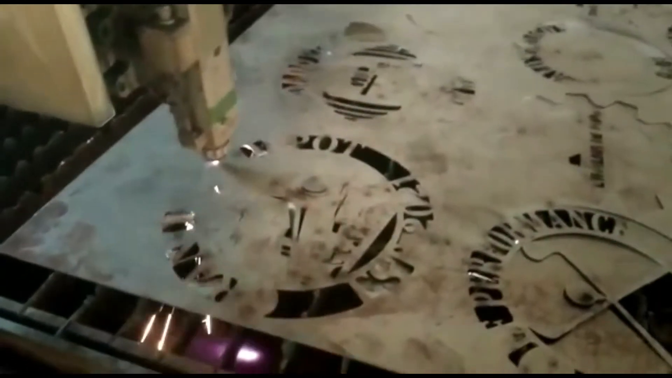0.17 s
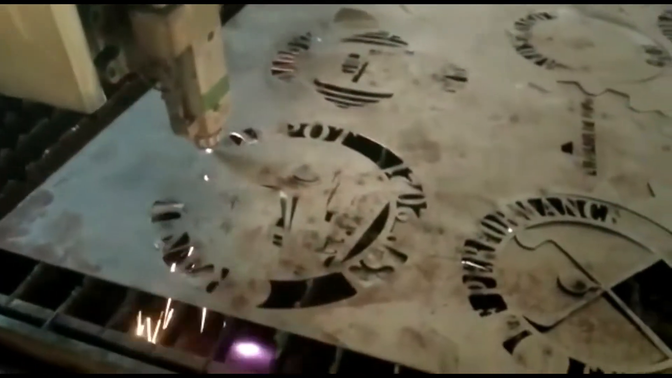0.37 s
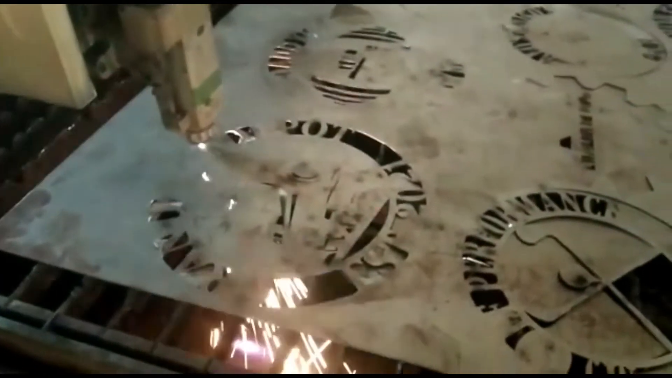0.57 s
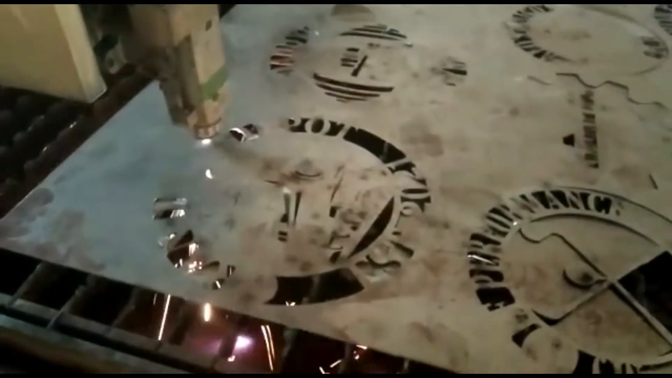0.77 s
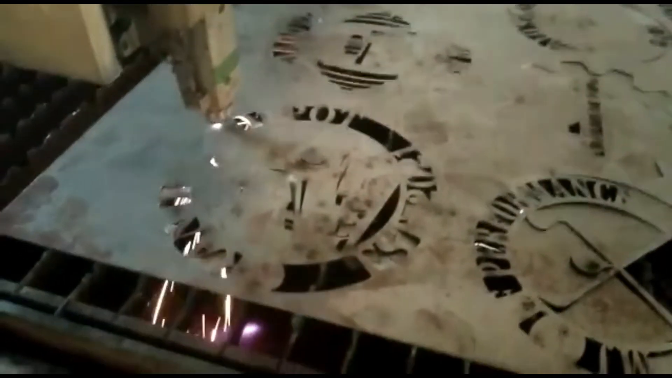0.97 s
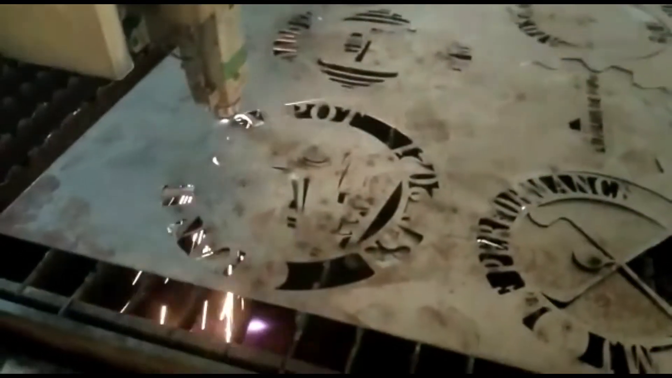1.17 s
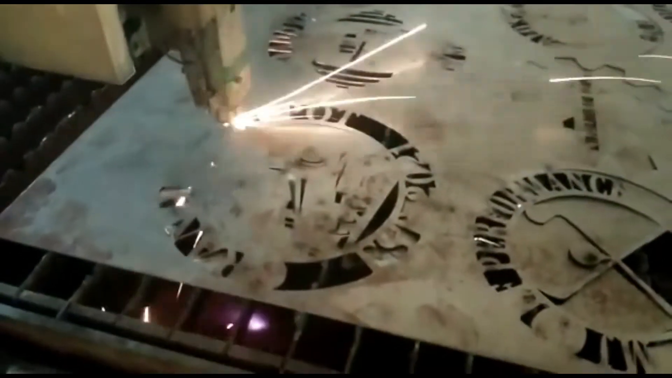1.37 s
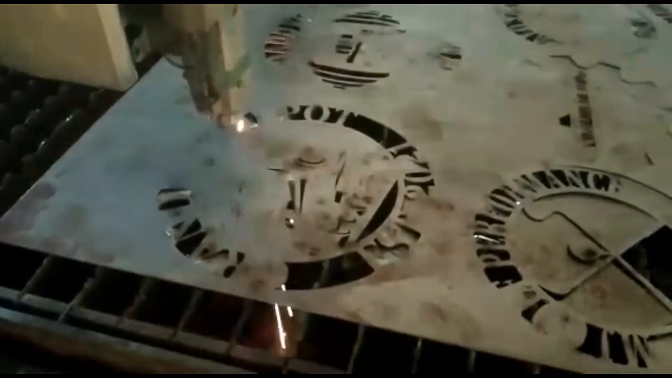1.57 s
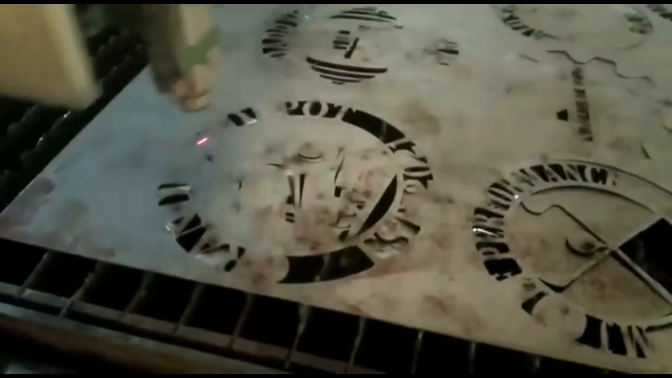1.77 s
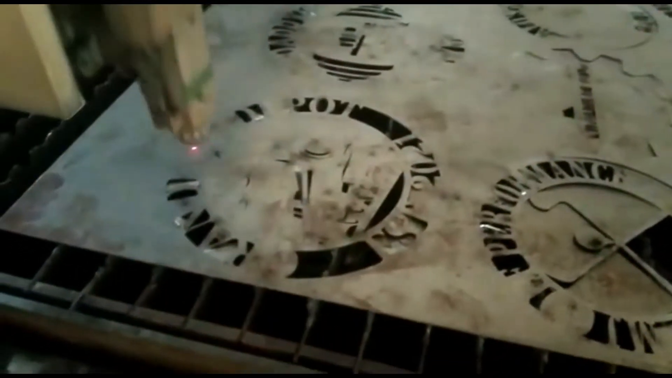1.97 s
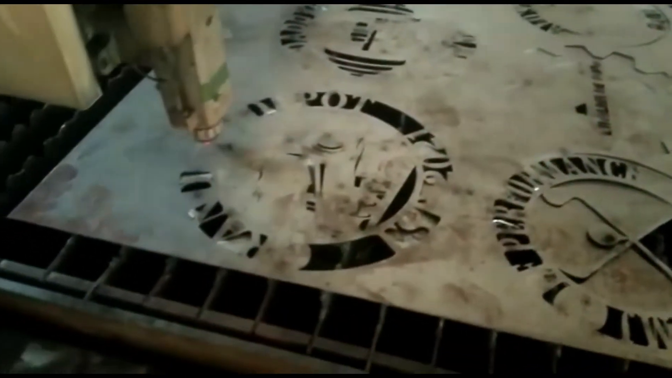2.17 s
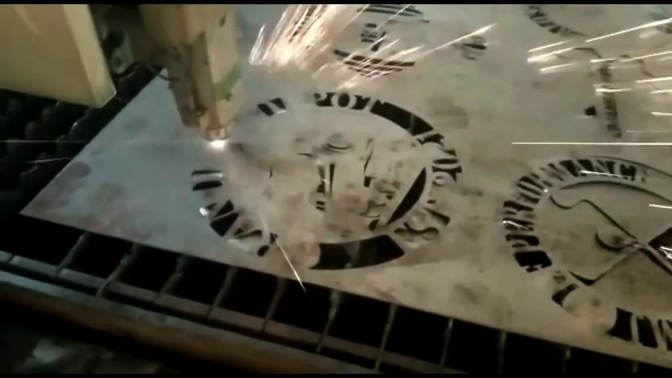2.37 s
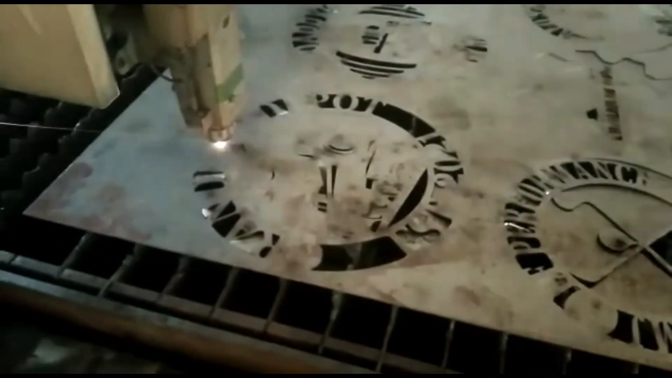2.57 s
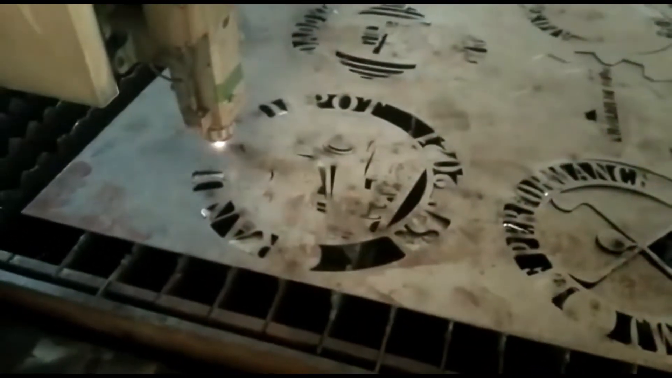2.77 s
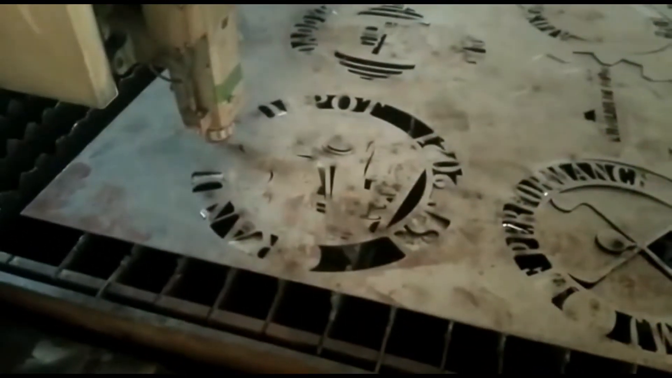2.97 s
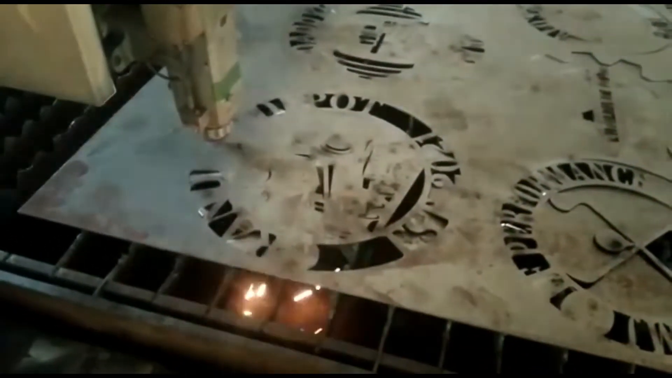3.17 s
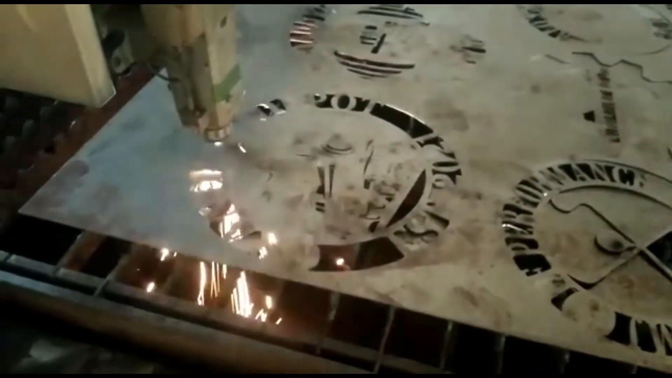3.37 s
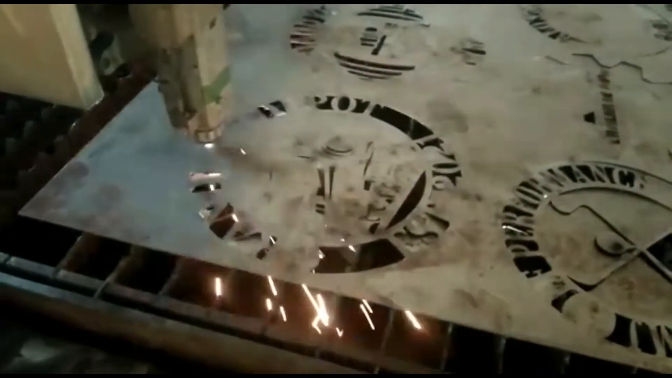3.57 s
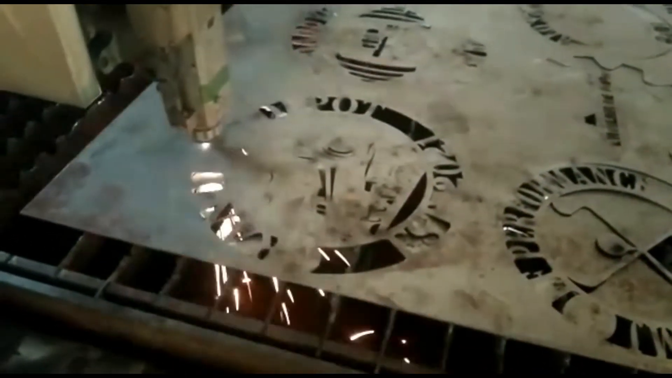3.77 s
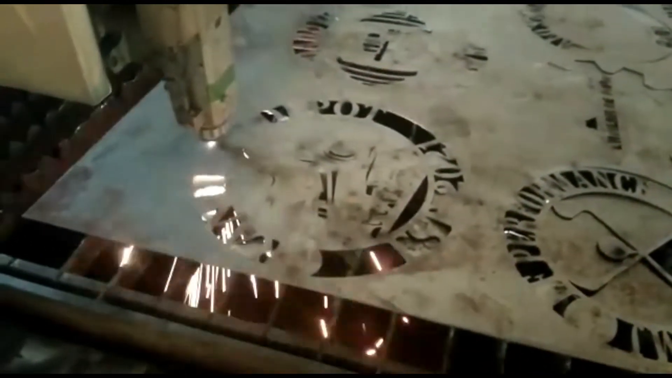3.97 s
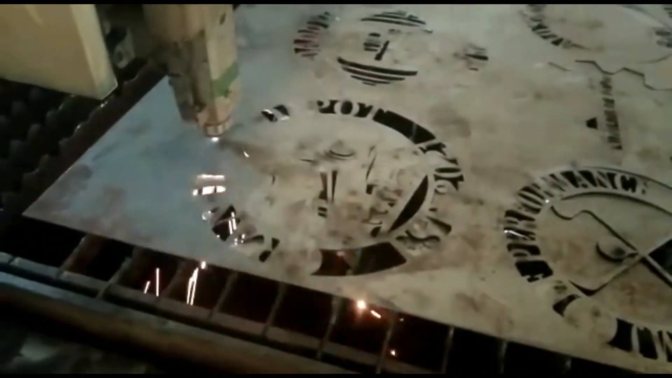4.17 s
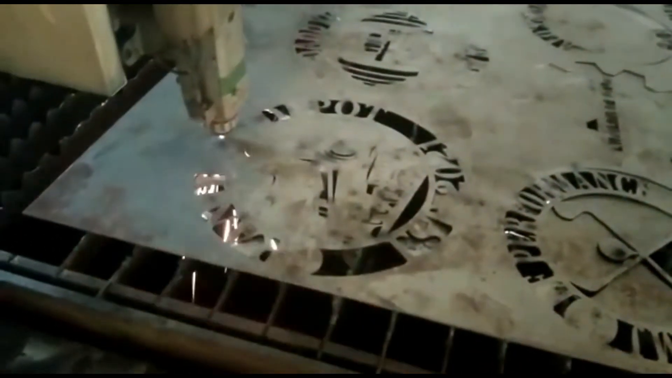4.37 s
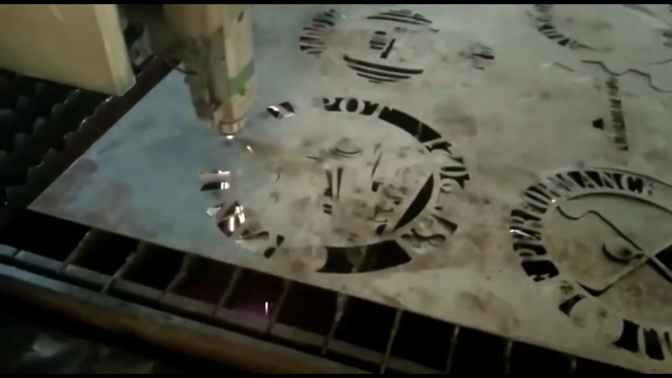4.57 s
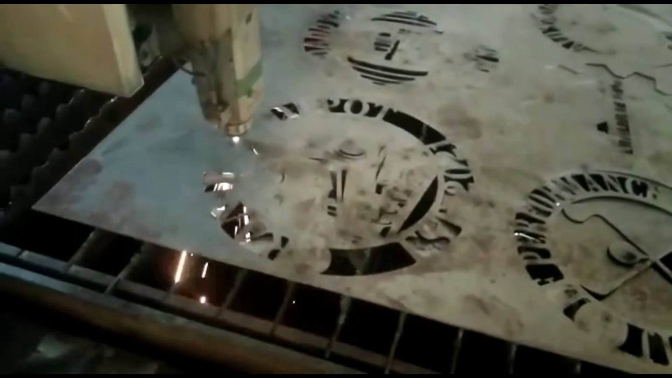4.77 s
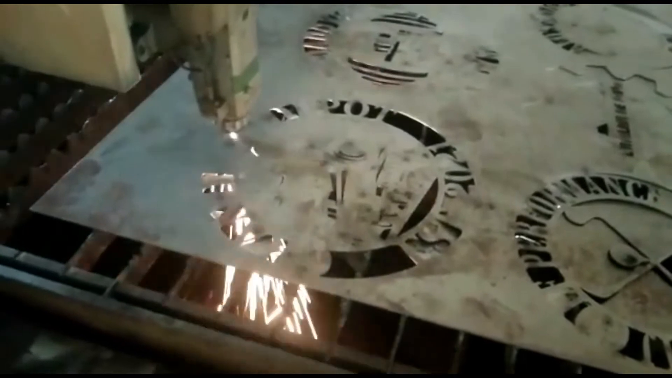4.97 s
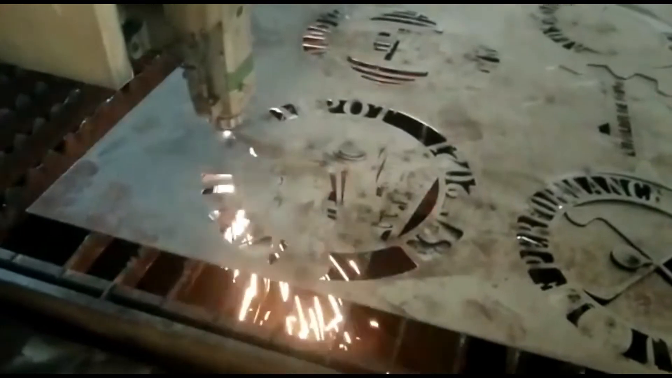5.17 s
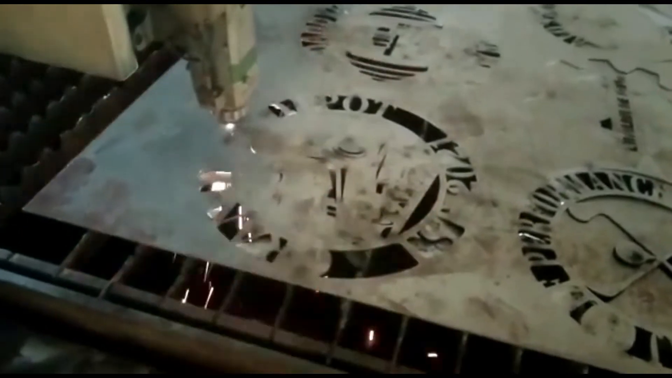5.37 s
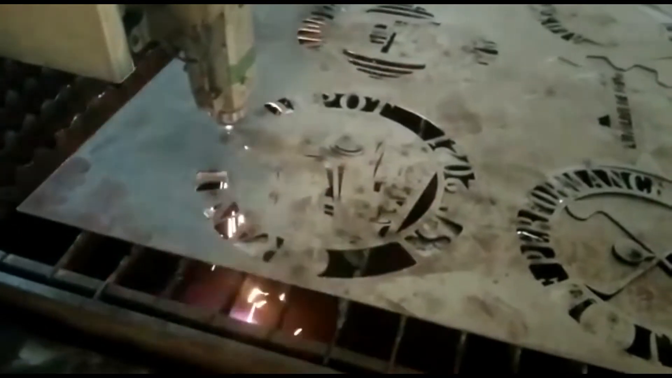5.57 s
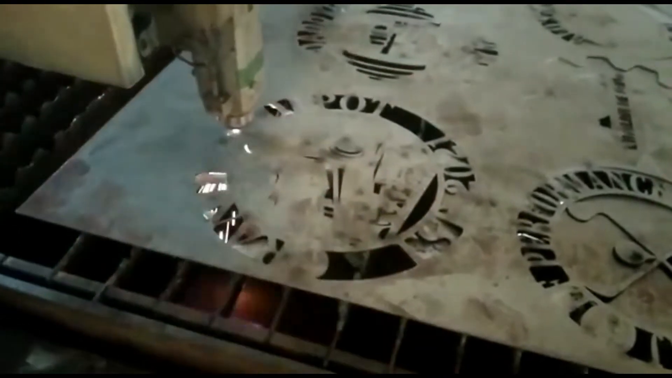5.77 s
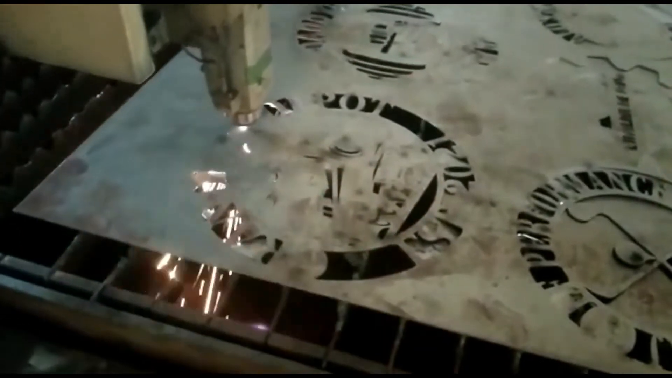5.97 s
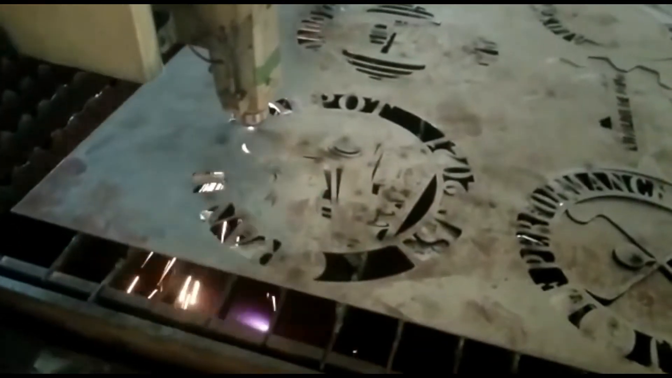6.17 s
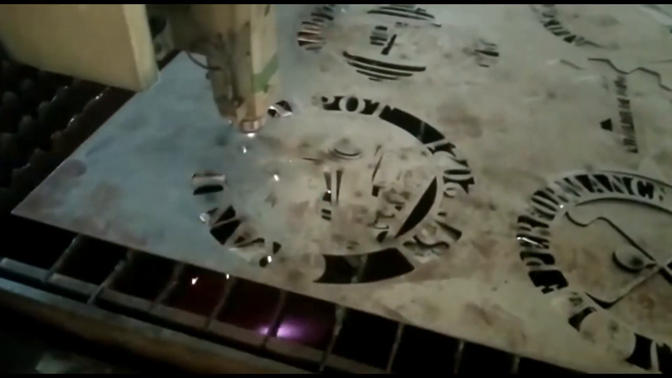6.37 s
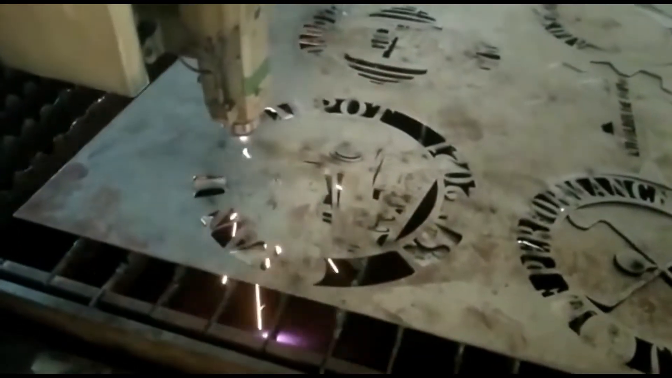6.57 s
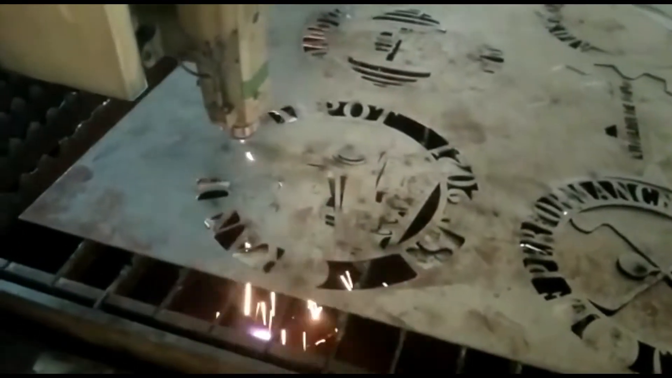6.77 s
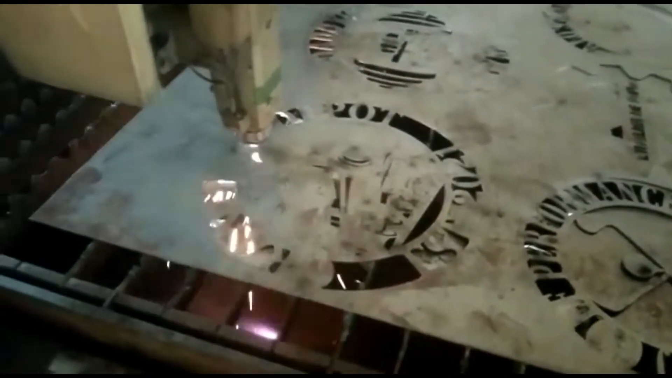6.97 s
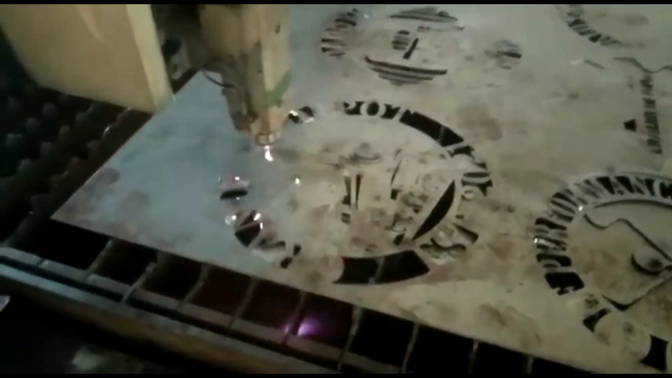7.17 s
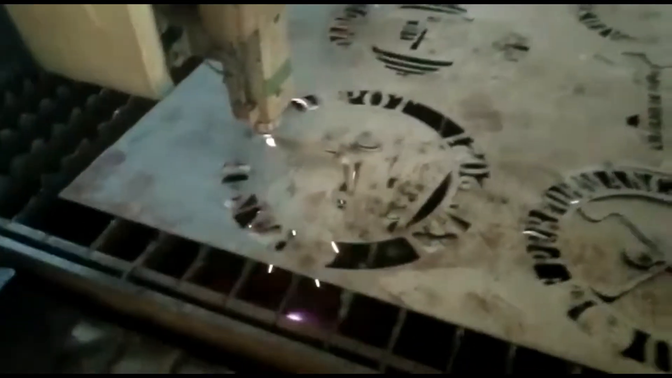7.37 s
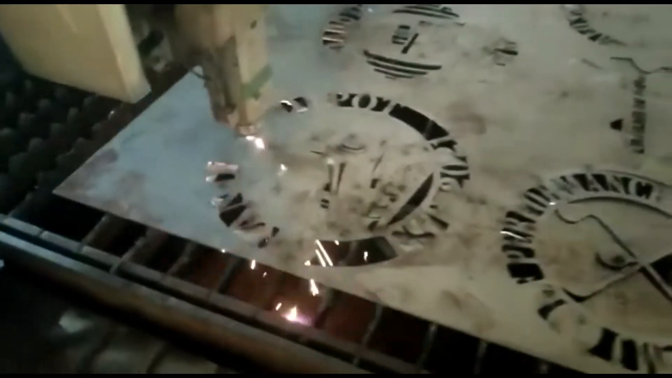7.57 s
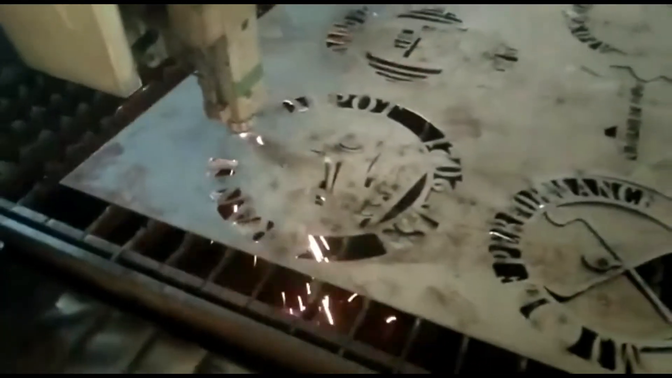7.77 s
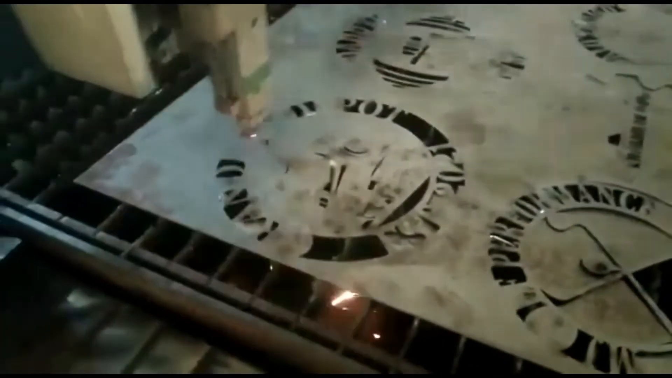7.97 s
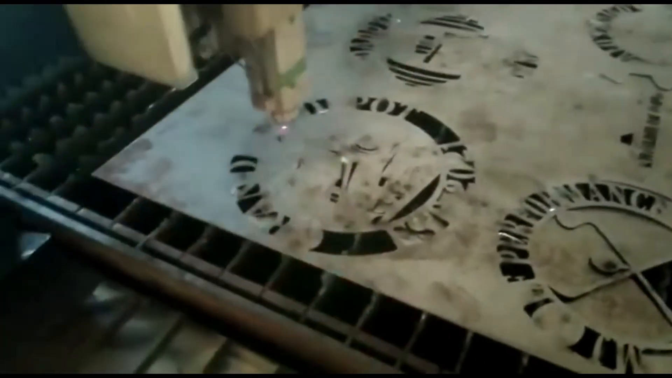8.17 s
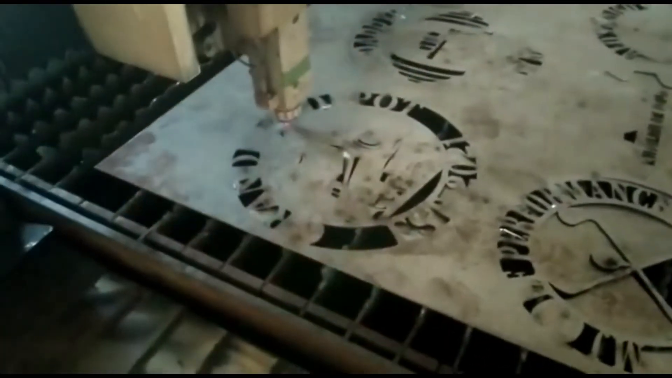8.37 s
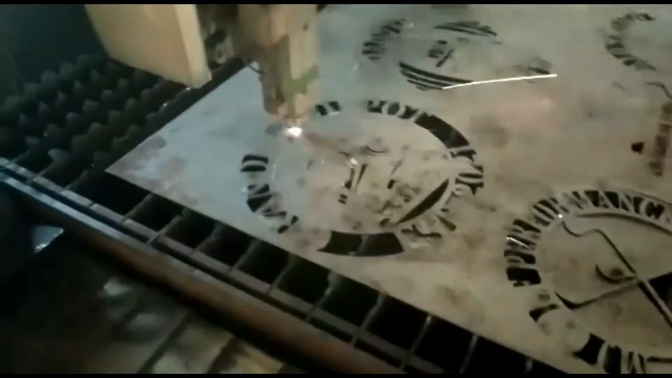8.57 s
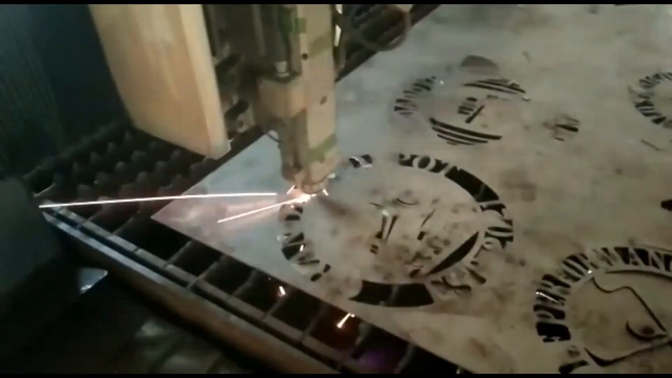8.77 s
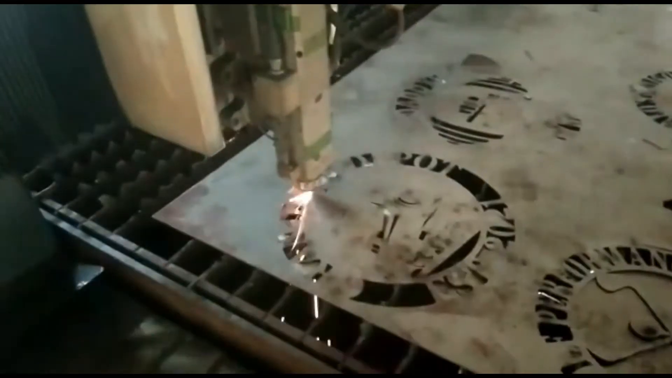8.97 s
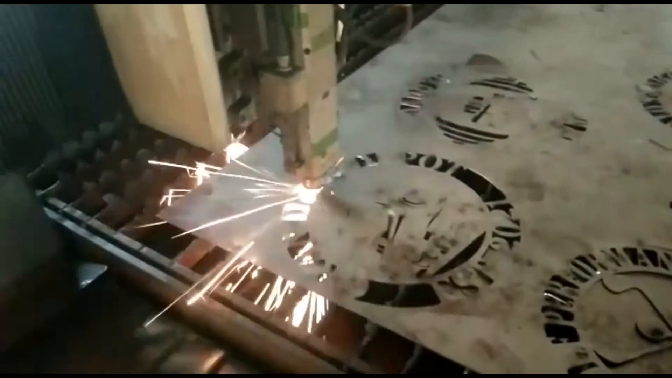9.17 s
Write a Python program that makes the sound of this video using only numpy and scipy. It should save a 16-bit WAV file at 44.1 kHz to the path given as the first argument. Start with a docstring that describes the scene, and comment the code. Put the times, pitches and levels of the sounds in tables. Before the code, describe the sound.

Steady high gas hiss from a laser head cutting steel, broken by two bouts of crackling pops and ending in a spray of spatter.

```python
"""A steady hiss of gas comes first: a laser head is cutting a steel sheet, close to one small microphone.
The gas hisses at the nozzle, rushes through the cut, roars under the table and whistles across slots.
When the head lifts and moves on, the jet sweeps over the microphone and buffets it with sharp pops.
Near the end the beam pierces the sheet: the gas surges and molten drops spray out.
Behind it all are a faint machine hum and, early on, one dull knock."""
import sys
import numpy as np
from scipy import signal
from scipy.fft import rfft, irfft, next_fast_len
from scipy.io import wavfile
from scipy.ndimage import uniform_filter1d, map_coordinates

SR = 44100
rng = np.random.default_rng(int(sys.argv[2]) if len(sys.argv) > 2 else 0)


def to_wav(sig):
    """Store sig (one row per channel, or 1-D mono) as 16-bit WAV at the path in sys.argv[1].

    Samples outside -1..1 are clipped; the rate is SR.
    """
    pcm = np.clip(np.atleast_2d(sig), -1, 1) * 32767
    pcm = np.round(pcm).astype(np.int16)
    wavfile.write(sys.argv[1], SR, pcm.T)  # frames by channels


N = 406161
T = np.arange(N) / SR
FFT_SIZE = next_fast_len(N)
FFT_HZ = np.fft.rfftfreq(FFT_SIZE, 1 / SR)

# tone colours of the nozzle hiss, the fine fizz above it, the rush and the roar: f/Hz, relative level/dB
HISS_COLOUR = [(2000, -66), (3000, -20), (4750, -11.5), (5300, -7.5), (6200, -2.5), (6780, 4), (7200, -5),
               (7750, -9), (8200, -16.5), (8900, -23.5), (10000, -26.5), (12000, -65)]
FIZZ_COLOUR = [(2000, -30), (6000, -12), (8000, -2), (9150, 1.5), (9650, -7), (10350, 2.5), (11300, -1),
               (11950, -4), (12400, -15), (12950, -8), (13500, -2), (14300, -.5), (15300, 1), (16400, 4)]
RUSH_COLOUR = [(800, -55), (1500, -29), (2250, -12), (2550, -5.5), (3250, -6.5), (3600, -0.5), (4150, 1),
               (4650, -1), (5350, 7.5), (6000, 5), (7000, 5), (9000, -25.5), (12000, -27)]
ROAR_COLOUR = [(50, -29), (200, -9.5), (600, -3.5), (900, -1.5), (1300, 0), (1750, 0), (2200, -3),
               (3200, -3), (6000, -31), (12000, -50)]
# slow drift of the hiss and of the fizz: t/s, relative level/dB
HISS_DRIFT = [(0, -26), (1.4, -26), (1.9, -20.5), (2.06, -28.5), (3.6, -28), (4.6, -25.5), (6.8, -25),
              (7.5, -25.5), (8.3, -27), (9.2, -36.5)]
FIZZ_DRIFT = [(0, -42.5), (1.7, -44.5), (2.3, -45.5), (3.2, -45), (4.2, -42), (5.2, -42), (8.5, -46)]
# gas forced through the cut as the head follows its path: t/s, relative rush/dB, relative roar/dB
CUT_DRIFT = [(0, -33, -41.5), (.9, -30, -42), (1.7, -25, -42), (2.2, -30.5, -47), (3.1, -30, -48),
             (3.7, -33, -45.5), (5.6, -33.5, -43.5), (6.3, -33.5, -45.5), (6.97, -30.5, -44.5),
             (7.13, -30.5, -42.5), (7.7, -30, -47), (8.72, -34, -49.5), (9, -25, -43)]
# the hiss and fizz slide down as head and microphone move: t/s, factor on frequency
COLOUR_SLIDE = [(0, 1), (2.2, .992), (3.5, .978), (5, .962), (6.5, .948), (8, .938), (9.2, .935)]
# swells of gas along the cut: peak t/s, build-up/s, hiss boost/dB, rush boost/dB
GAS_SWELLS = [(1.2, .3, 2.5, 1.5), (1.55, 0.13, 1.5, 3), (3.43, 0.39, 1, 3.5), (5.75, 0.22, -1, 5),
              (7.55, .25, -2.5, 6.5), (7.84, 0.22, 4, 1)]
# spurts as a new cut begins: t/s, settling time/s, hiss boost/dB, rush boost/dB, roar boost/dB
GAS_SPURTS = [(2.44, 0.27, 2, 1, 2), (8.58, 0.098, 0, 4.5, 6), (8.734, 0.17, 12, 5.5, 1.5)]
# whistles at slots and edges in the sheet: start t/s, end t/s, f/Hz, width/Hz, level at the middle/dB
SLOT_WHISTLES = [(0.601, 1.8, 1330, 110, -49.5), (0.699, 1.895, 2560, 260, -41.5),
                 (1.646, 2.125, 6650, 450, -23), (3.451, 4.15, 1770, 150, -51),
                 (3.76, 4.06, 3460, 60, -42.5), (4.35, 5.35, 2550, 160, -47), (5, 5.246, 1870, 70, -48),
                 (5.08, 5.38, 3520, 50, -41.5), (4.502, 7, 7330, 380, -32.5), (6.899, 7.65, 2550, 745, -41),
                 (8.198, 8.8, 3660, 380, -41.5)]
# jet on the microphone, fast cores in slower fringes, and stray puffs: t/s, length/s, wind speed (0-1)
JET_GUSTS = [(1.729, .147, .35), (1.746, .096, .9), (1.947, .13, .33), (1.968, .098, .94),
             (2.438, 0.044, 0.01), (2.722, 0.039, 0.01), (3.32, .03, .002), (8.06, .187, 0.32),
             (8.104, .045, 1), (8.209, .037, 0.51)]
# the biggest single eddies (swirls of air) that hit the microphone: t/s, relative level/dB
EDDY_POPS = [(1.7307, -17.5), (1.869, -21), (1.978, 4), (2.445, -27.5), (2.466, -30), (8.0643, -10.5),
             (8.0665, -12), (8.1055, -7.5), (8.1672, -14), (8.2032, -24), (8.2381, -7)]
# ring of the microphone's opening in wind: f/Hz, gain/dB
MIC_RING = [(100, 6), (2500, 3), (4500, 4), (6300, 11.5), (8000, -1), (10000, -9.5), (12200, -15),
            (15000, -6)]
# tone colour of molten drops thrown from the pierced hole: f/Hz, relative level/dB
SPATTER_COLOUR = [(500, -27), (720, -8), (880, 2.5), (1350, 3), (1700, -8), (3200, -7), (4900, 15),
                  (5700, 22), (6400, -5), (6900, 14), (7500, -1), (9100, 0.5), (10500, -25), (15000, -23)]
# knock from the gantry, the frame that carries the head: t/s, level/dB, f/Hz, time to fade by 60 dB/s
GANTRY_KNOCK = (.903, -26, 165, .05)
# hum of fans and pumps: f/Hz, level/dB
HUM_TONES = [(100, -62.5), (111, -68), (200, -62)]
# tone colour of the workshop's background noise: f/Hz, relative level/dB
SHOP_COLOUR = [(20, -38), (40, -24), (65, -4.5), (105, -0.5), (140, 3), (200, 1.5), (400, 1), (700, -15),
               (1500, -3.5), (12000, -26)]


def gas_jet(fizz_db, rush_db, roar_db, flutter_db, sputter_db):
    """The jet hisses at the nozzle; melt leaving the cut makes the rush and roar sputter slightly."""
    flutter = flutter_db * wander(rate_hz=27)
    sputter = sputter_db * wander(rate_hz=45)
    hiss_surge, rush_surge, roar_surge = gas_surges()
    facing = jet_aim()  # hiss and fizz grow while the jet points at the microphone
    hiss = sheet_bounce(noise(HISS_COLOUR))
    hiss *= amp(curve(HISS_DRIFT) + hiss_surge + 5.5 * facing + flutter)
    fizz = sheet_bounce(noise(FIZZ_COLOUR))
    fizz *= amp(curve(FIZZ_DRIFT) + 10.5 * facing + fizz_db + flutter)
    rush = noise(RUSH_COLOUR) * amp(curve(CUT_DRIFT, column=1) + rush_surge + rush_db + sputter)
    roar = noise(ROAR_COLOUR) * amp(curve(CUT_DRIFT, column=2) + roar_surge + roar_db + sputter)
    return hiss + fizz + echoes(rush + roar, fade_s=0.08, echo_db=-10.5)


def gas_surges(swell_drop_s=0.074, spurt_rise_s=0.0072):
    """Decibels added to hiss, rush and roar: swells build and then drop, spurts jump and then settle."""
    hiss, rush, roar = np.zeros((3, N))
    for peak, build_s, hiss_db, rush_db in GAS_SWELLS:
        swell = np.interp(T, [peak - build_s, peak, peak + swell_drop_s], [0, 1, 0])
        hiss += hiss_db * swell
        rush += rush_db * swell
    for start, settle_s, hiss_db, rush_db, roar_db in GAS_SPURTS:
        spurt = ramp(start, spurt_rise_s) * np.exp(-abs(T - start) / settle_s)
        hiss += hiss_db * spurt
        rush += rush_db * spurt
        roar += roar_db * spurt
    return hiss, rush, roar


def jet_aim(smooth_s=0.12):
    """How squarely the jet points at the microphone, 0-1: its sound spreads wider than its wind."""
    span = round(smooth_s * SR)
    return uniform_filter1d(uniform_filter1d(wind_speed(), span), span)


def sheet_bounce(x):
    """Sound mixes with its bounce off the sheet; the colour slides down as the paths get longer."""
    bounced = echoes(x, fade_s=0.044, echo_db=-12)
    read_at = np.cumsum(curve(COLOUR_SLIDE))
    return unit(map_coordinates(bounced, [read_at], order=3, mode="mirror"))


def whistles():
    """Each slot picks a fuzzy tone out of the jet, swelling and fading as the nozzle passes."""
    out = np.zeros(N)
    for start, end, hz, width_hz, db in SLOT_WHISTLES:
        during = (T > start) & (T < end)
        count = during.sum()
        band = np.exp(-2 * ((np.fft.rfftfreq(count, 1 / SR) - hz) / width_hz) ** 2)
        tone = unit(irfft(rfft(rng.standard_normal(N)[:count]) * band, count))
        out[during] += amp(db) * tone * np.hanning(count)
    return out


def wind_on_mic(large_db, small_db, hiss_db, large_per_s, small_per_s, soften_hz, low_cut_hz):
    """Slow wind sheds large thudding eddies; fast wind breaks into small crackling ones and fine hiss."""
    speed = wind_speed()
    unbroken = 1 - 0.71 * speed  # fast wind tears the large eddies apart
    large_kicks = eddy_kicks(large_per_s * (1 + speed), spread=.7) * speed ** .6 * unbroken
    large = eddy(large_kicks, leak_hz=160)
    large = signal.sosfilt(signal.butter(1, soften_hz, fs=SR, output="sos"), large)  # round fronts
    small_kicks = eddy_kicks(small_per_s * speed ** 2.8, spread=1.0) * speed ** 0.37
    small = eddy(small_kicks, leak_hz=614)
    hiss = speed * rng.standard_normal(N)
    pressure = amp(large_db) * large + amp(small_db) * small + amp(hiss_db) * hiss
    for k, (start, db) in enumerate(EDDY_POPS):
        hit = round(start * SR)
        leak_hz = 90 + 1500 * speed[hit] ** 2  # faster wind, sharper pop
        pressure -= (-1) ** k * amp(db) * eddy(np.arange(N) == hit, leak_hz)
    # the microphone passes no steady pressure, so each step swings back
    low_cut = signal.butter(2, low_cut_hz, "high", fs=SR, output="sos")
    return signal.sosfilt(low_cut, colour(pressure, MIC_RING))


def wind_speed(rise_s=.012, fall_s=.008):
    """Each gust rises quickly, holds and dies away; the fastest one at each moment counts."""
    gusts = [speed * ramp(start, rise_s) * np.exp(-np.maximum(T - start - length, 0) / fall_s)
             for start, length, speed in JET_GUSTS]
    return np.max(gusts, axis=0)


def eddy_kicks(per_s, spread):
    """Passing eddies push and pull in turn, with uneven timing and strength."""
    rate = per_s * np.exp(spread * wander(rate_hz=500))
    passed = np.floor(np.cumsum(rate) / SR)
    return np.diff(passed, prepend=0) * (-1) ** passed * rng.uniform(0.31, 1.47, N)


def eddy(kicks, leak_hz):
    """Each kick is a sudden pressure step that leaks away; small eddies leak faster."""
    return signal.lfilter([1], [1, -np.exp(-2 * np.pi * leak_hz / SR)], kicks)


def spatter(start_s, rise_s, db, drops_per_s):
    """The beam pierces the sheet and throws out a dense fan of drops, each a tiny tick."""
    ticks = rng.standard_normal(N) * (rng.random(N) < drops_per_s / SR)
    return amp(db) * unit(colour(ticks, SPATTER_COLOUR)) * ramp(start_s, rise_s)


def knock(start_s, db, hz, fade_s, rise_s=0.0016):
    """The gantry, struck softly, rings briefly on one low note."""
    age = np.maximum(T - start_s, 0)
    soft_start = 1 - np.exp(-age / rise_s)
    return amp(db - 60 * age / fade_s) * np.sin(2 * np.pi * hz * age) * soft_start


def machine_hum(waver_hz, shop_db):
    """Fans and pumps hum on wavering tones over the low noise of the workshop."""
    hum = np.zeros(N)
    for hz, db in HUM_TONES:
        pitch_hz = hz + waver_hz * wander(rate_hz=10.1)
        hum += amp(db) * unit(np.sin(2 * np.pi * np.cumsum(pitch_hz) / SR))
    return hum + amp(shop_db) * noise(SHOP_COLOUR)


def echoes(x, fade_s, echo_db, per_s=2000):
    """Mixes in scattered echoes from the gantry and the table, which fall by 60 dB in fade_s."""
    delay = T[:SR // 5]
    bounces = rng.standard_normal(len(delay)) * (rng.random(len(delay)) < per_s / SR) * (delay > .002)
    bounces *= amp(-60 * delay / fade_s)
    echo = signal.oaconvolve(x, bounces / np.linalg.norm(bounces))[:N]
    return (x + amp(echo_db) * echo) / np.hypot(1, amp(echo_db))


def amp(db):
    """Turns decibels into a gain."""
    return 10 ** (np.asarray(db) / 20)


def unit(x):
    """Scales x to an average strength (rms) of 1."""
    return x / np.sqrt(np.mean(x ** 2) + 1e-20)


def ramp(start_s, rise_s):
    """Climbs from 0 to 1 and stays there."""
    return np.clip((T - start_s) / rise_s, 0, 1)


def curve(rows, column=1):
    """Joins the points of a time table with straight lines."""
    rows = np.array(rows)
    return np.interp(T, rows[:, 0], rows[:, column])


def colour(x, points):
    """Turns each frequency of x up or down by a table of f/Hz, level/dB."""
    hz, db = np.transpose(points)
    gain = amp(np.interp(np.log(FFT_HZ + 1), np.log(hz), db))
    return irfft(rfft(x, FFT_SIZE) * gain, FFT_SIZE)[:N]


def noise(points):
    """Noise of strength 1 with the given tone colour."""
    return unit(colour(rng.standard_normal(N), points))


def wander(rate_hz):
    """A smooth random wobble of strength 1, mostly slower than rate_hz."""
    keep_slow = np.exp(-(FFT_HZ / rate_hz) ** 2)
    return unit(irfft(rfft(rng.standard_normal(FFT_SIZE)) * keep_slow, FFT_SIZE)[:N])


def scene():
    """Gas, spatter, machine and wind on the microphone, the same in both channels."""
    mix = gas_jet(fizz_db=4.5, rush_db=4.0, roar_db=1.5, flutter_db=0.48, sputter_db=0.07) + whistles()
    mix += spatter(start_s=8.735, rise_s=0.0087, db=-27.0, drops_per_s=8100)
    mix += knock(*GANTRY_KNOCK) + machine_hum(waver_hz=3.02, shop_db=-51.5)
    mix += wind_on_mic(large_db=-12, small_db=-12.5, hiss_db=-22.5,
                       large_per_s=110, small_per_s=1400, soften_hz=905, low_cut_hz=71)
    return np.array([mix, mix])


def record(dry):
    """The microphone rounds off the hardest gusts, and the highest treble is cut away."""
    ceiling, top_hz = .8, 15560
    rounded = dry / (1 + (dry / ceiling) ** 4) ** (1 / 4)
    treble_cut = signal.firwin(1023, top_hz, window=("kaiser", 9), fs=SR)
    return signal.oaconvolve(rounded, treble_cut[None], "same", axes=1)


dry = scene()
out = record(dry)
to_wav(out)
```